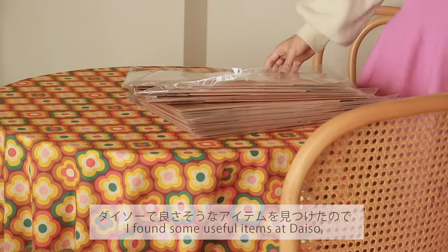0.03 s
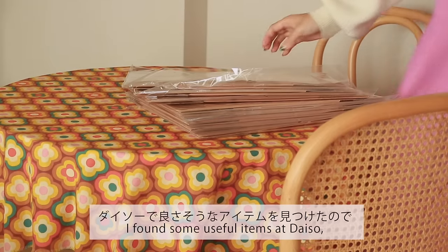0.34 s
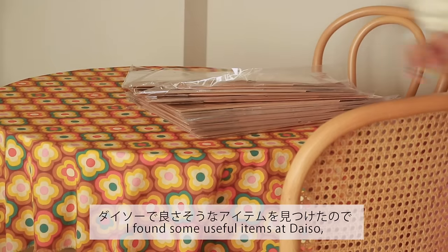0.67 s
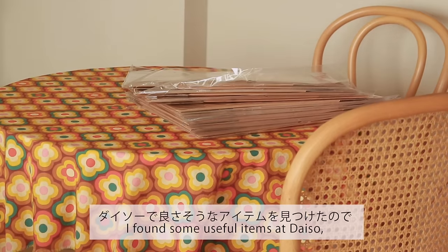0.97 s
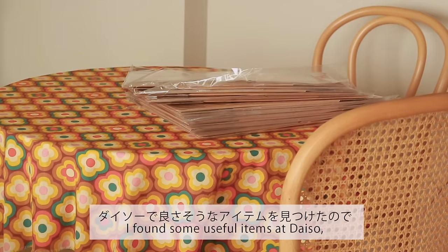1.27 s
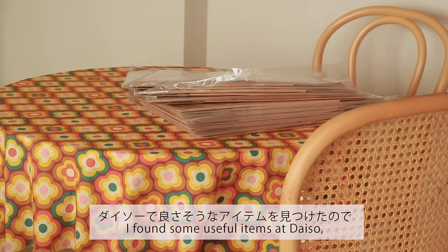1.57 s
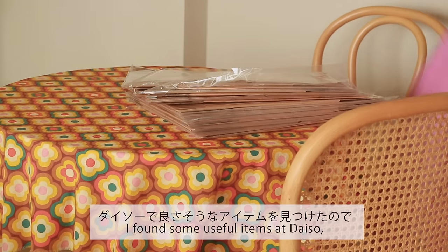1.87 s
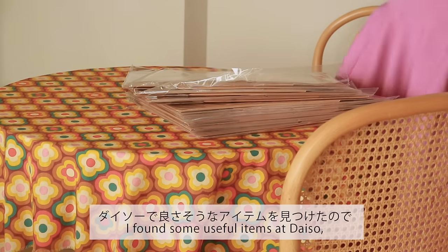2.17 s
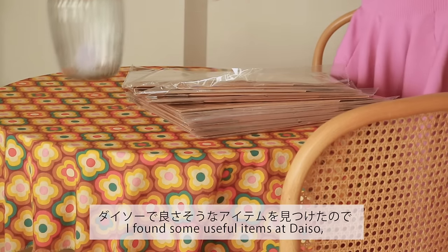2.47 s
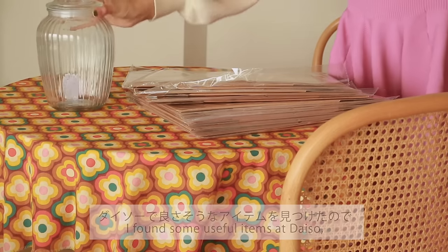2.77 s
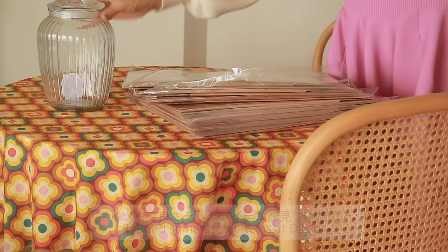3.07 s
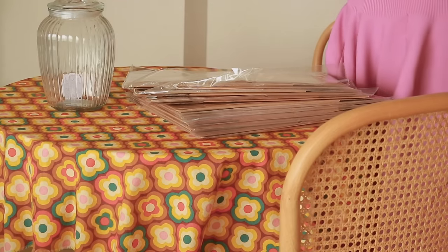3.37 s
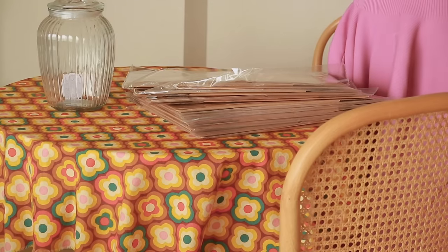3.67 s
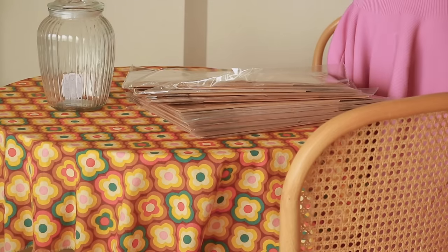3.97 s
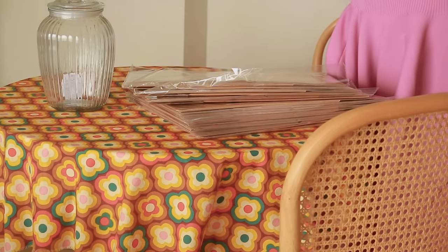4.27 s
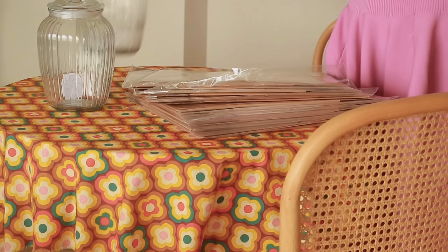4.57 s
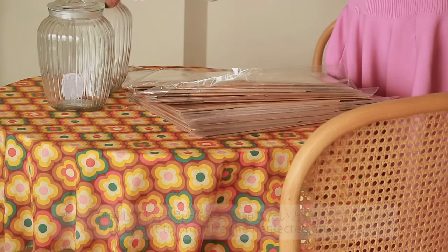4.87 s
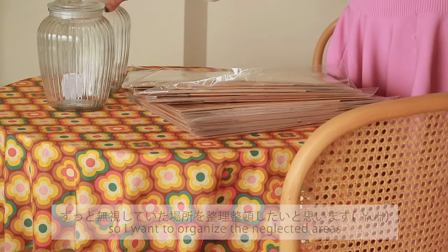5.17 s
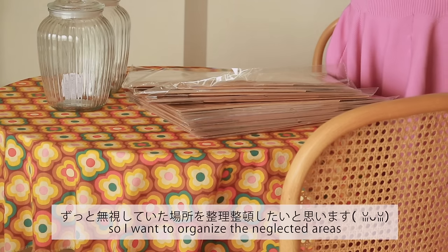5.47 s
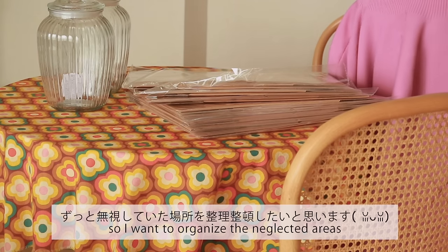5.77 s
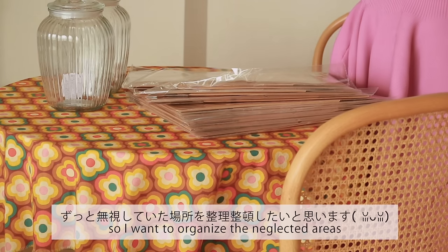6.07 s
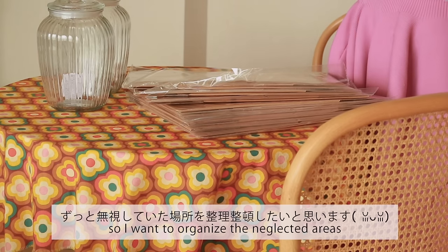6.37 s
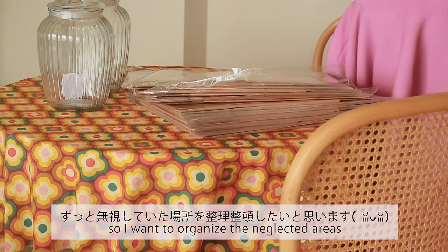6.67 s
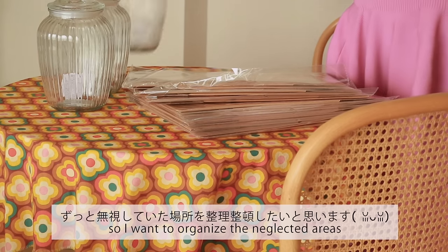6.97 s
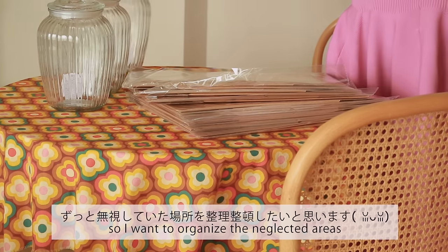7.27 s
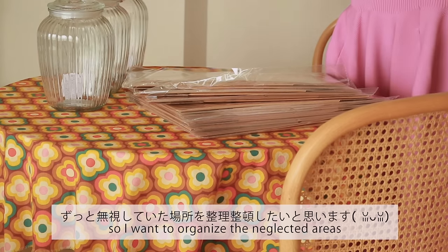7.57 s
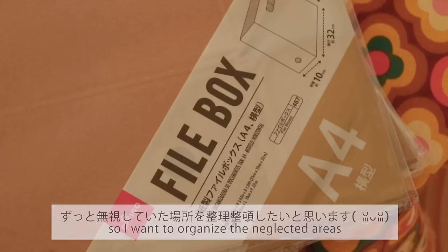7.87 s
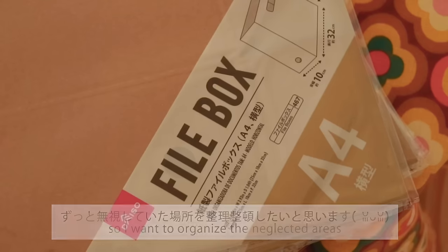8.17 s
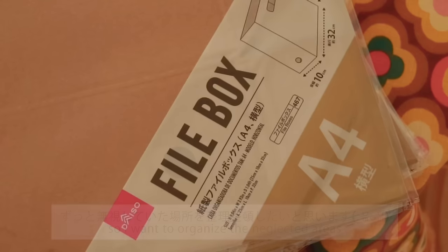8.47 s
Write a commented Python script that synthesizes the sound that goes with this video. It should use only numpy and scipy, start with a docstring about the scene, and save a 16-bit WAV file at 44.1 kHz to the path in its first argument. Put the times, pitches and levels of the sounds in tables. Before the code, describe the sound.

Soft plastic rustling and scuffing steps, followed by glass jars thudding down and clinking together in a quiet room.

```python
"""Plastic film snaps and crackles as a hand leaves a stack of wrapped packs; then steps scuff and
clothes rustle by stick-slip friction. Three lidded glass jars are fetched and set down in turn on a
cloth-covered table, which cushions each impact to a dull thud. The second and third clink against a
neighbour, ringing in the normal modes of the glass, and their lids chink when lifted.
A small room adds echoes, standing waves and reverberation, over a steady hush of air."""
import sys
import numpy as np
from scipy import signal
from scipy.fft import rfft, irfft
from scipy.io import wavfile

SR = 44100
rng = np.random.default_rng(int(sys.argv[2]) if len(sys.argv) > 2 else 0)


def unload_audio(sound):
    """Save the sound as a 16-bit wav file, at the path given as the first command line argument."""
    columns = np.transpose(np.atleast_2d(sound))
    # keep every value between -1 and 1, then stretch to whole-number steps
    steps = np.round(np.clip(columns, -1, 1) * 32767)
    wavfile.write(sys.argv[1], SR, steps.astype(np.int16))


N = 376040

# normal modes of a jar: f/Hz
MODE_HZ = [1242, 2001, 2035, 2062, 2086, 2125, 2250, 3200, 3343, 3456, 3600, 3649, 4258, 4354, 4453, 5480,
           5537, 5750, 5825, 5914, 6363, 6589, 7000, 7522, 8000, 8682, 10585, 11100]
# decay and excitation of each mode: t60/s, then relative level/dB for each of the four struck spots
MODE_RESPONSE = [ (0.23, -28, -9, -28, -26), (0.2, -1.5, 1, -12, -13), (0.42, -1, -2.5, -13, -5),
                 (0.6, -4, -7, -10, 2.5), (0.15, -20, 1.5, -14, 0), (0.065, -12, 2.5, -16, -11),
                 (0.057, -28, -16, -22, -24), (0.068, -15, -15, -4, -7), (0.14, -17, -6.5, -4.5, 7),
                 (0.23, -10, -11, -7, 2), (0.22, -9, -10, 0, -10), (0.56, -4.5, -6.5, -3, -7),
                 (0.2, -39, -21, -11, -9), (0.22, -32, -6, -5, 5), (0.092, -13, -6.5, -1.5, 5),
                 (0.15, -27, -23, -18, 2), (0.14, -17, -10, -12, 6), (0.22, -19, -24, -13, -2),
                 (0.24, -18, -24, -24, 0), (0.24, -32, -22, -26, -12), (0.32, -33, -31, -20, -8),
                 (0.36, -23, -30, -26, -18), (0.3, -28, -20, -15, -19), (0.18, -39, -18, -9, -26),
                 (0.09, -44, -23, -24, -8), (0.15, -45, -25, -15, -6), (0.04, -44, -20, -24, -4),
                 (0.08, -44.5, -21, -28, -22)]


def amp(db):
    """Amplitude ratio of a level in decibels."""
    return 10 ** (np.asarray(db) / 20)


def unit_rms(x):
    """Normalisation: each row is scaled to rms 1."""
    return x / np.sqrt(np.mean(x ** 2, axis=-1, keepdims=True) + 1e-30)


def curve_at(points, hz):
    """Interpolation along a logarithmic frequency axis."""
    f, value = np.transpose(points)
    return np.interp(np.log(hz + 1), np.log(f + 1), value)


def add(mix, s, sound):
    """Superposition: a sound joins the mix at time s."""
    part = mix[max(round(s * SR), 0):][:len(sound)]
    part += sound[:len(part)]


def filtered(x, spectrum):
    """Zero-phase filtering by a gain curve (f/Hz, level/dB)."""
    hz = np.fft.rfftfreq(x.shape[-1], 1 / SR)
    return irfft(rfft(x) * amp(curve_at(spectrum, hz)), x.shape[-1])


def coloured(x, spectrum):
    """Spectral shaping, at rms 1."""
    return unit_rms(filtered(x, spectrum))


def convolved(x, response):
    """A linear system convolves its input with its impulse response."""
    return signal.oaconvolve(x, response)[:len(x)]


def pulse(shape_db, size=4096):
    """Minimum phase gives the sharpest causal pulse of a given spectrum; peak 1."""
    hz = abs(np.fft.fftfreq(size, 1 / SR))
    log_gain = np.log(amp(np.maximum(shape_db(hz), -90)))
    spectrum = np.exp(np.conj(signal.hilbert(log_gain)))
    wave = np.fft.ifft(spectrum).real[:size // 2]
    return wave / abs(wave).max()


def band_pulse(hz, octaves, bass_db):
    """A pulse with one spectral hump above a bass shelf: the narrower the band, the longer it lasts."""
    def shape_db(f):
        bell = -10 / np.log(10) * (np.log2((f + 1) / hz) / octaves) ** 2
        return np.where(f < hz, np.maximum(bell, bass_db), bell)
    return pulse(shape_db)


def grit(decay_s, size=2048):
    """Many tiny contacts sum to exponentially decaying noise, of unit energy."""
    burst = rng.standard_normal(size) * np.exp(-np.arange(size) / SR / decay_s)
    return burst / np.linalg.norm(burst)


def air(rumble_start_s=7.77, rumble_end_s=8.01, fade_s=0.025):
    """Partly uncorrelated noise at the two ears sounds wide: room air, hiss and a brief deep rumble."""
    # spectra of the in-phase air, the antiphase air and the rumble: f/Hz, relative level/dB
    mid_spectrum = [(15, -17), (60, -6.5), (150, -1.5), (250, -1), (520, 2), (680, -0.5), (860, 1.5),
                    (1250, 1), (1500, -3.5), (2200, -6), (7000, -9.5), (16000, -9)]
    side_spectrum = [(15, 7), (60, -2), (130, 2), (350, 3.5), (550, 1.5), (900, -1.5), (1500, -6),
                     (2500, -8.5), (8000, -11), (14000, -10.5)]
    rumble_spectrum = [(15, -10), (30, 7), (50, -20), (90, -40), (200, -63)]
    mid = amp(-54.5) * coloured(rng.standard_normal(N), mid_spectrum)
    side = amp(-53) * coloured(rng.standard_normal(N), side_spectrum)
    t = np.arange(N) / SR
    gate = np.clip(np.minimum(t - rumble_start_s, rumble_end_s - t) / fade_s, 0, 1)
    rumble = amp(-58) * gate * coloured(rng.standard_normal((2, N)), rumble_spectrum)
    return np.array([mid + side, mid - side]) + rumble


def room(tail_db, echo_db, standing_db, ceiling_db, rise_s=0.0039, standing_t60=0.19):
    """A room's impulse response sums direct sound, early reflections, standing waves and a diffuse tail."""
    # diffuse field: f/Hz, t60/s, relative level/dB
    reverberation = [(102.5, 0.59, 0.5), (404, 0.43, 0), (900, 0.43, 2.5), (2530, 0.38, -1),
                     (5070, 0.38, -0.5), (7570, 0.33, 9.5), (14000, 0.46, -10)]
    # reflections from nearby walls and ceiling: delay/s, relative gain
    reflections = [(.0028, 0.85), (.0098, 0.95), (.0118, 0.32), (.0132, -0.18), (.0162, -0.037),
                   (.0245, 0.033), (.0362, 0.044)]
    # standing waves at the table: f/Hz in one list, relative level/dB in the other
    standing_hz = [166, 241, 285, 334, 633, 721, 772, 823, 857, 923, 1024, 1097, 1150]
    standing_levels = [8, 11.5, 9.5, 0, 6.5, 9, 3.5, 4, 13, 11, 2, 7, 2]
    hz, frame_s, noise = signal.stft(rng.standard_normal(SR), SR, nperseg=256)
    t60 = curve_at([(f, seconds) for f, seconds, _ in reverberation], hz)
    tail = signal.istft(noise * amp(-60 * frame_s / t60[:, None]), SR, nperseg=256)[1][:SR]
    t = np.arange(SR) / SR
    build_up = 1 - np.exp(-(t / rise_s) ** 2)
    ceiling_scatter = amp(ceiling_db) * np.exp(-((t - 0.0132) / 0.0021) ** 2)
    tail *= build_up + ceiling_scatter
    tail_spectrum = [(f, db) for f, _, db in reverberation]
    response = amp(tail_db) * filtered(tail / np.linalg.norm(tail), tail_spectrum)
    response[0] += 1  # direct sound
    for delay, gain in reflections:
        response[round(delay * SR)] += gain * amp(echo_db)
    damping = np.log(1000) / standing_t60
    for f, db in zip(standing_hz, standing_levels):
        resonance = 2 * damping / SR * np.cos(2 * np.pi * f * t) * np.exp(-damping * t)
        response += amp(db + standing_db) * resonance
    return response * np.minimum(1, 10 * (1 - t))  # fades over the last 0.1 s


def strokes(rows, rise, ends_db=-20.5):
    """Rubbing grows louder with speed, for the share `rise` of a stroke; overlaps add in power."""
    t, power = np.arange(N) / SR, np.zeros(N)
    for s, length, db in rows:
        from_peak = np.maximum((s - t) / rise, (t - s) / (1 - rise)) / length  # 1 at either end
        near = from_peak < 4
        power[near] += amp(db + ends_db * from_peak[near]) ** 2
    return np.sqrt(power)


def friction(spectrum, slips_per_s, spread_db):
    """Stick-slip friction: a random stream of tiny, uneven slips, coloured by the surface."""
    sizes = amp(spread_db * np.minimum(rng.exponential(1, N), 4))
    signs = rng.choice([-1, 1], N)
    slipping = rng.random(N) < slips_per_s / SR
    return coloured(sizes * signs * slipping, spectrum)


def rustle():
    """Friction sounds only during motion: film and cloth crackle, and steps scuff more dully."""
    # movements: t/s when fastest, length/s, relative level/dB
    film_strokes = [(.012, 0.3, -46.5), (.168, 0.086, -49), (.31, 0.7, -57), (.59, 0.79, -63.5),
                    (.755, 0.29, -58), (1.09, 0.24, -57.5), (1.255, 0.52, -52.5), (1.70, 0.33, -54),
                    (1.995, 0.47, -50), (2.19, 0.24, -58), (2.50, 0.54, -54)]
    scuff_strokes = [(1.775, 0.17, -53.5), (1.985, 0.11, -47), (2.045, 0.36, -49.5), (2.285, 0.24, -53.5),
                     (2.405, 0.13, -48), (2.49, 0.24, -52), (8.515, 0.68, -59)]
    # spectra of the rubbing surfaces: f/Hz, relative level/dB
    film_spectrum = [(200, -13), (600, -8), (1150, 3), (1600, 3), (2400, 3), (3300, 4.5), (4100, -4.5),
                     (5200, 1.5), (7300, -16.5), (11000, -11.5), (16000, -31)]
    scuff_spectrum = [(80, -37), (200, -11), (350, -9), (470, 6), (560, 2), (700, -9), (1100, -31),
                      (2500, -48)]
    film = strokes(film_strokes, rise=0.55) * friction(film_spectrum, slips_per_s=2500, spread_db=1.5)
    scuff = strokes(scuff_strokes, rise=0.42) * friction(scuff_spectrum, slips_per_s=1500, spread_db=7.5)
    return amp(-0.5) * film + amp(-4.5) * scuff


def ticks(snap_gain=0.42):
    """Impulsive excitation: each snap of film or handling tick is a click and a short gritty scrape."""
    # snaps and ticks: t/s, relative level/dB, centre f/Hz, width/octaves, time constant of the grit/s
    snaps = [(0.0304, -19.5, 3200, .35, 0.0005), (0.0304, -19.5, 4800, .3, 0.0005),
             (0.0305, -28, 10000, .3, .0006), (0.0729, -34.5, 1300, .7, 0.0012),
             (0.1576, -29.5, 1950, .8, .0006), (0.1578, -39, 9500, .3, .0008),
             (0.1758, -30.5, 1300, .8, .001), (.2935, -38, 3800, 1.14, .003),
             (.6440, -34.5, 1300, 0.87, 0.00093), (1.1862, -35.5, 1600, 0.77, .004),
             (1.7867, -30.5, 1250, 0.85, 0.0012), (1.8947, -37, 1200, 1.6, .003),
             (2.1453, -47.5, 950, 0.33, .003), (2.272, -47, 425, 0.2, 0.0075),
             (3.6263, -38.5, 895, 1.02, .002), (3.853, -32.5, 1200, 1.17, 0.0042),
             (4.338, -66, 6580, .012, .02), (5.8268, -31, 1200, 1, 0.009), (5.827, -34, 3500, 2.2, .005),
             (5.831, -31, 6600, 0.4, .012), (5.873, -43, 1800, 1.15, .005), (6.270, -44, 3000, .7, .002),
             (6.297, -38.5, 2950, 0.52, .0015), (6.3364, -33, 2750, 0.55, .001),
             (7.1636, -37, 1400, .8, .008)]
    # colour common to them all: f/Hz, gain/dB
    tick_spectrum = [(2300, 0), (3200, 3.5), (4100, -4), (5100, 4), (6200, -2), (7500, -3), (10000, 1)]
    out = np.zeros(N)
    for s, db, hz, octaves, decay_s in snaps:
        click = band_pulse(hz, octaves, bass_db=-50)
        scrape = signal.fftconvolve(grit(decay_s), click)
        scrape *= np.linalg.norm(click) / np.linalg.norm(scrape)
        add(out, s, amp(db) * snap_gain * click)
        add(out, s, amp(db) * scrape)
    return filtered(out, tick_spectrum)


def thuds(settle_s=0.0088, flat_width=0.78):
    """A cushioned impact has little treble: a jar or foot gives two low pushes, edge first, then flat."""
    # jar landings and footfalls: t/s, edge level/dB, flat level/dB, centre f/Hz, edge width/octaves
    landings = [(1.209, -36.5, -49, 96, 2.06), (1.893, -42.5, -47, 185, 1.34), (2.904, -32, -28, 295, 0.77),
                (2.97, -39.5, -47, 335, 0.94), (3.227, -52, -70, 131, 1), (5.164, -33, -24, 375, 0.68),
                (7.573, -31.5, -39, 287, 0.56), (7.612, -55, -66, 75, .53)]
    # low boom of table and floor, which reshapes those levels: f/Hz, gain/dB
    boom = [(25, -28), (42, 3), (62, 3), (95, -3.5), (155, 5), (200, -4), (300, -2)]
    out = np.zeros(N)
    for s, edge_db, flat_db, hz, octaves in landings:
        add(out, s, amp(edge_db) * band_pulse(hz, octaves, bass_db=-25))
        add(out, s + settle_s, amp(flat_db) * band_pulse(hz, octaves * flat_width, bass_db=-16))
    return filtered(out, boom)


def glass_modes(space, split=0.0054, spread_s=0.0016):
    """Ribbed glass is never quite round, so each damped mode splits into a beating pair; rows at rms 1."""
    hz, t60 = np.array(MODE_HZ)[:, None], np.array(MODE_RESPONSE)[:, :1]
    t = np.arange(SR) / SR
    phase = 2 * np.pi * hz * t
    twin_ratio = 1 + split * rng.standard_normal(hz.shape)
    modes = np.sin(phase) + np.sin(phase * twin_ratio)
    modes *= np.exp(-np.log(1000) * t / t60)
    modes *= 1 - np.exp(-(t / spread_s) ** 2)  # each mode swells in over about a millisecond, so its onset is soft
    return unit_rms(np.array([convolved(mode, space) for mode in modes]))


def contact_gain(hz, cutoff_hz):
    """A contact acts as a low-pass filter: the softer it is, the less treble it excites."""
    return 1 / np.sqrt(1 + (hz / cutoff_hz) ** 4)


def clinks(space, rattle_s=0.046, crack_s=0.0012):
    """Impact of glass on glass excites the modes, with a hollow knock, a crack and a rattle of the lid."""
    # names of the struck spots: wall of the second jar, of the third, lid of the second, of the third
    spots = ("wall 2", "wall 3", "lid 2", "lid 3")
    # blows: t/s, knock level/dB, ring level/dB, contact cutoff f/Hz, spot
    blows = [ (3.172, -75, -74, 1780, "wall 2"), (3.206, -75, -77, 1800, "wall 2"),
             (3.928, -64, -79, 9000, "lid 2"), (4.069, -61, -71, 12200, "lid 2"),
             (4.098, -61, -67, 12300, "lid 2"), (4.298, -70, -76.5, 6000, "lid 2"),
             (4.340, -70, -79.5, 7000, "lid 2"), (4.988, -13, -46.5, 13060, "wall 2"),
             (5.2405, -23, -57.5, 2900, "wall 3"), (6.4732, -67, -73.5, 11000, "lid 3"),
             (6.4772, -70, -77.5, 11000, "lid 3"), (7.4660, -8, -46, 11840, "wall 3"),
             (7.5853, -17.5, -56, 5550, "wall 3")]
    # contact noise at each spot, relative to the ring: rattle level/dB, crack level/dB, crack f/Hz
    contact_noise = [(-11, -20, 2800), (-14, -14.5, 4900), (-13, -7, 4000), (-15, 5.5, 5400)]
    # one push of air as the whole jar recoils: f/Hz, relative level/dB
    knock_spectrum = [(20, -49), (70, -35), (160, -28), (280, -13.5), (500, -2), (750, 3.5), (950, 1),
                      (1150, 0.5), (1350, -16), (1600, -36.5), (3000, -32), (8000, -54)]
    # dense rattle of lid and glass: f/Hz, relative level/dB
    rattle_spectrum = [(800, -11), (1800, -27), (3000, 9), (5000, 2), (7000, -8), (9000, -14), (11000, -8),
                       (16000, -25)]
    rings = glass_modes(space)
    recoil = pulse(lambda f: curve_at(knock_spectrum, f))
    knock = convolved(np.pad(recoil, (0, SR)), space)
    mode_hz, bin_hz = np.array(MODE_HZ), np.fft.rfftfreq(SR, 1 / SR)
    spot_db = np.transpose(MODE_RESPONSE)[1:]
    out = np.zeros(N)
    for s, knock_db, ring_db, cutoff_hz, spot_name in blows:
        spot = spots.index(spot_name)
        rattle_db, crack_db, crack_hz = contact_noise[spot]
        rattle = coloured(grit(rattle_s, size=SR), rattle_spectrum)
        crack = convolved(grit(crack_s, size=SR), band_pulse(crack_hz, octaves=1.0, bass_db=-37))
        noise = amp(rattle_db) * rattle + amp(crack_db) * unit_rms(crack)
        softened = irfft(rfft(noise) * contact_gain(bin_hz, cutoff_hz), SR)
        ring = (contact_gain(mode_hz, cutoff_hz) * amp(spot_db[spot])) @ rings
        add(out, s, amp(knock_db) * knock)
        add(out, s, amp(ring_db) * (ring + convolved(softened, space)))
    return out


def scene():
    """Superposition: all handling reaches the centre through the room, over a wide bed of air."""
    clink_space = room(tail_db=-0.5, echo_db=-17.0, standing_db=-6.0, ceiling_db=0.0)
    thud_space = room(tail_db=4.0, echo_db=-13.0, standing_db=2.0, ceiling_db=-6.0)
    handling_space = room(tail_db=-0.5, echo_db=-14.5, standing_db=1.5, ceiling_db=2.0)
    impacts = clinks(clink_space) + convolved(thuds(), thud_space)
    handling = convolved(ticks() + rustle(), handling_space)
    return air() + handling + impacts


def record(dry):
    """Band limiting: a linear-phase low-pass filter removes the highest treble."""
    cutoff_hz = 15850
    low_pass = signal.firwin(511, cutoff_hz, window=("kaiser", 9), fs=SR)
    return signal.oaconvolve(dry, low_pass[None], "same", axes=1)


dry = scene()
out = record(dry)
unload_audio(out)
```